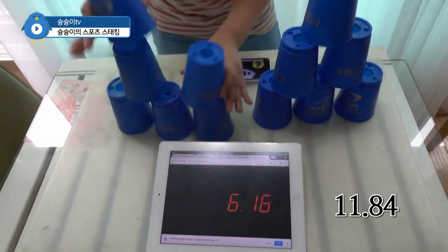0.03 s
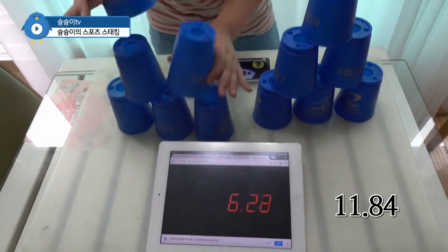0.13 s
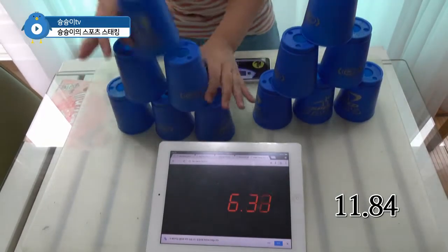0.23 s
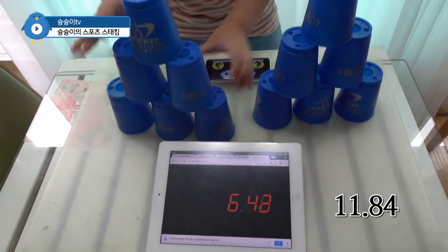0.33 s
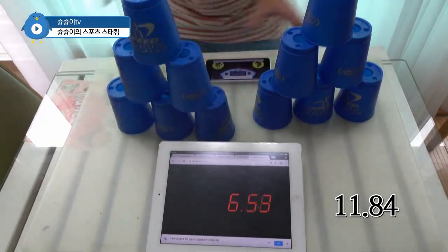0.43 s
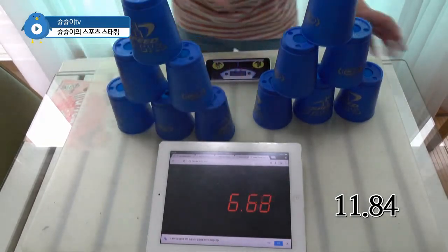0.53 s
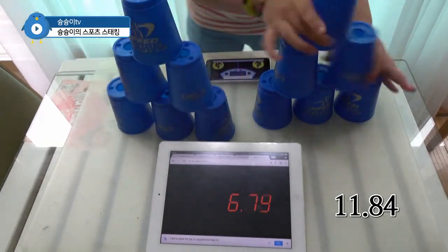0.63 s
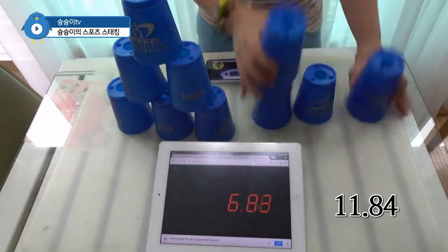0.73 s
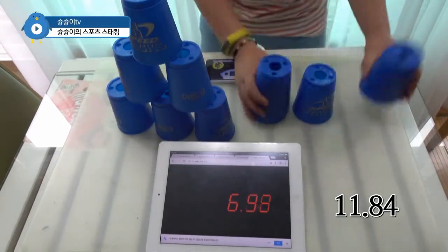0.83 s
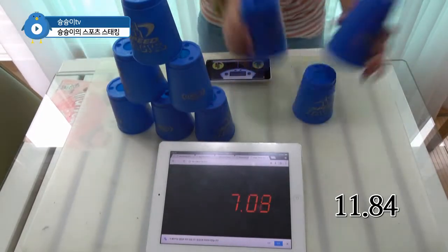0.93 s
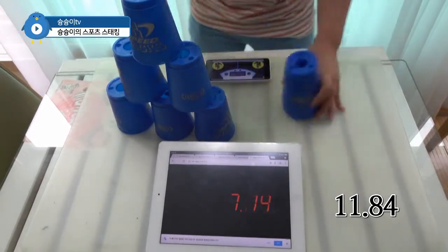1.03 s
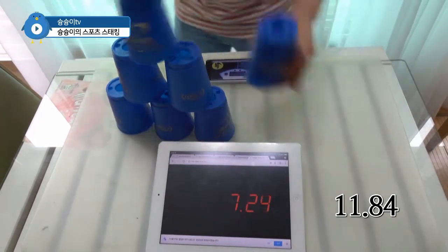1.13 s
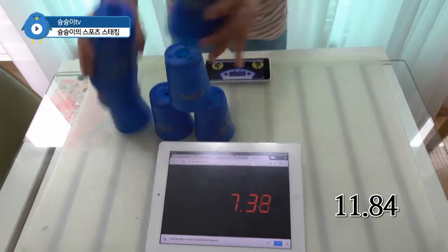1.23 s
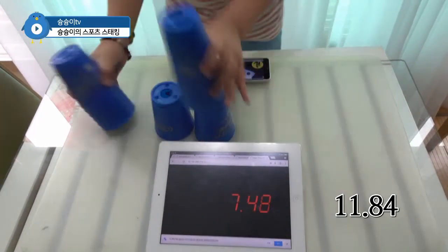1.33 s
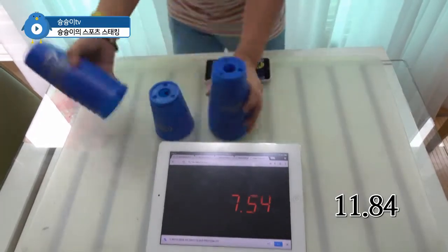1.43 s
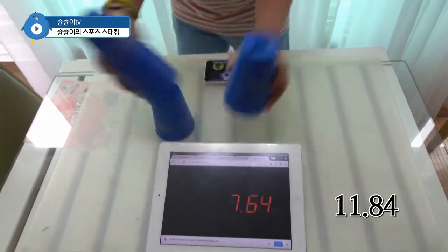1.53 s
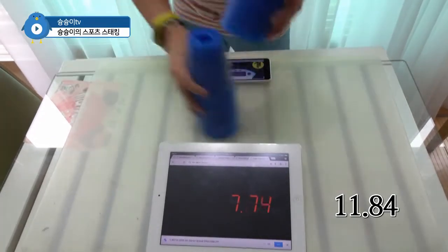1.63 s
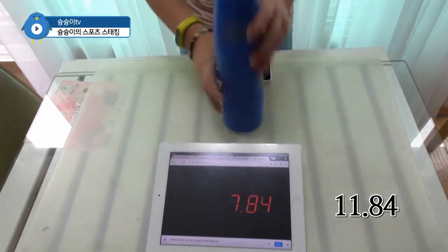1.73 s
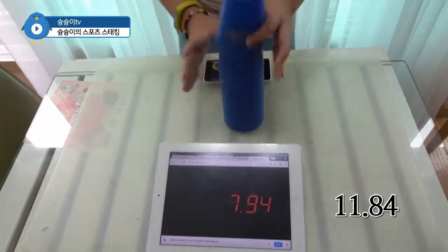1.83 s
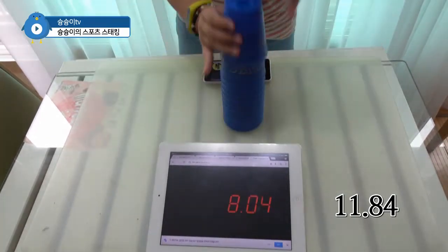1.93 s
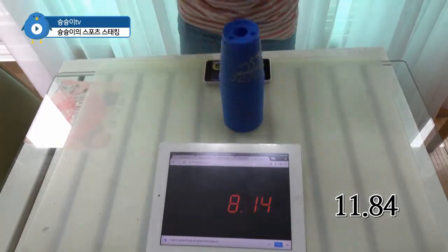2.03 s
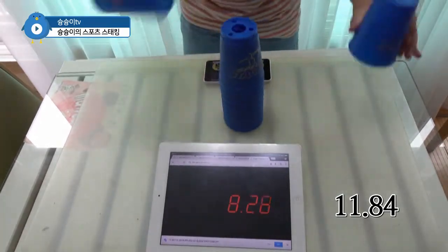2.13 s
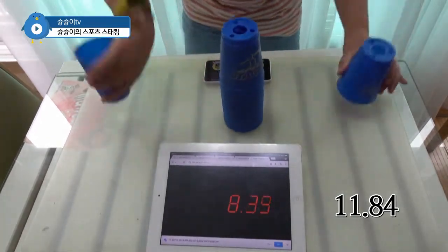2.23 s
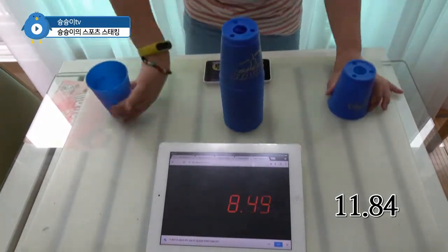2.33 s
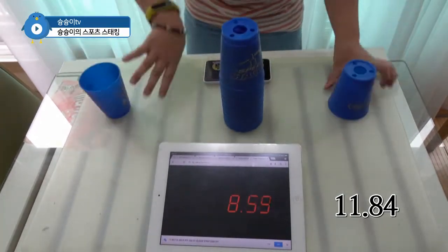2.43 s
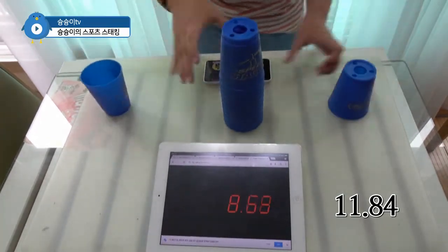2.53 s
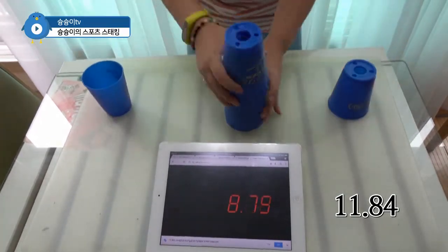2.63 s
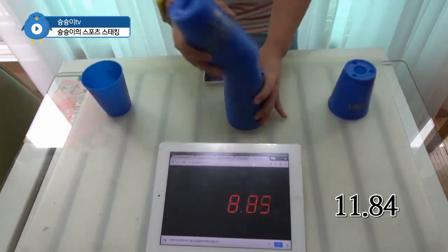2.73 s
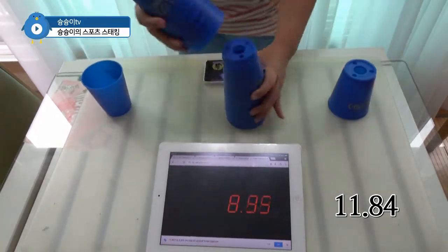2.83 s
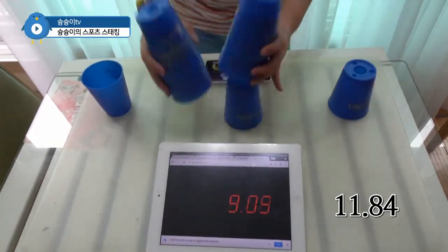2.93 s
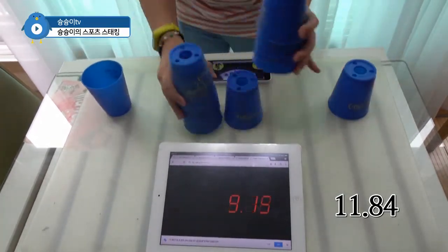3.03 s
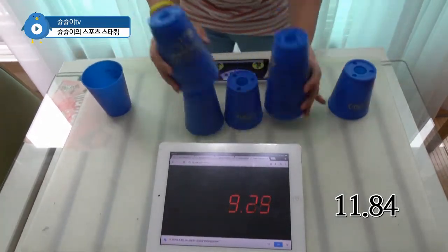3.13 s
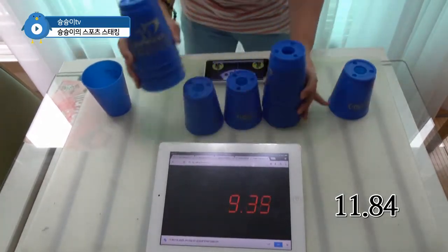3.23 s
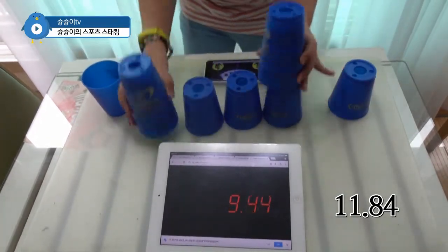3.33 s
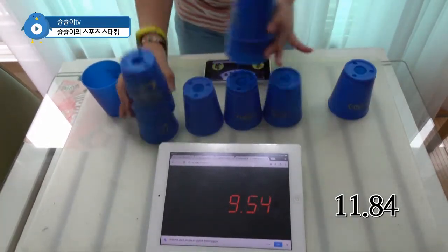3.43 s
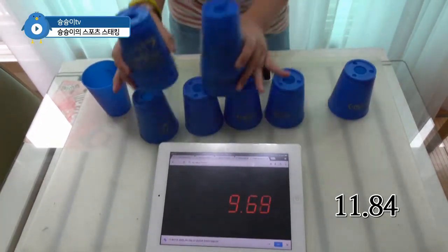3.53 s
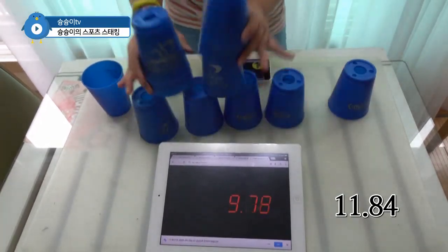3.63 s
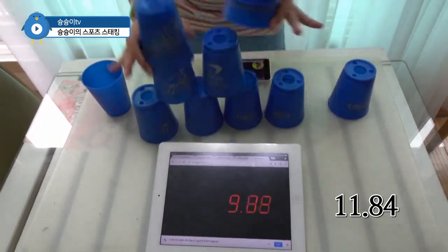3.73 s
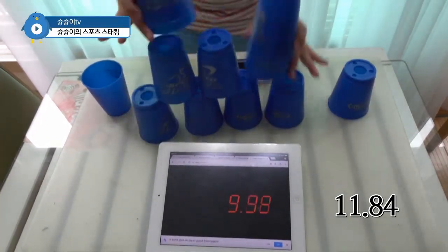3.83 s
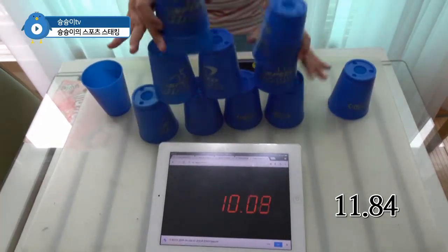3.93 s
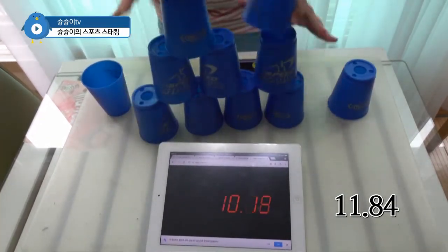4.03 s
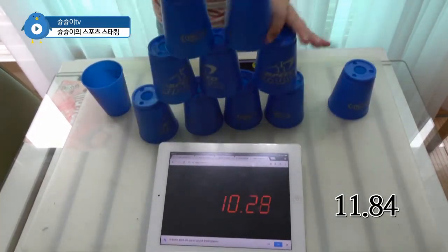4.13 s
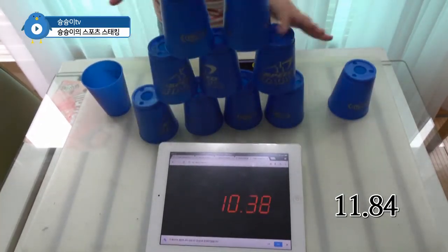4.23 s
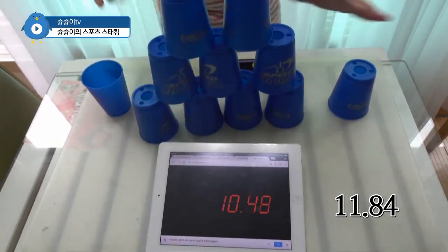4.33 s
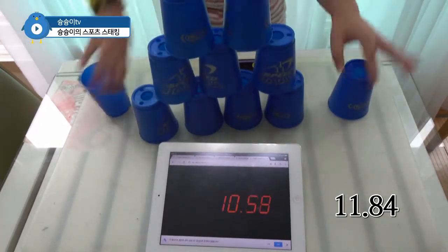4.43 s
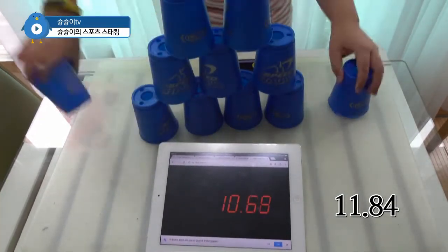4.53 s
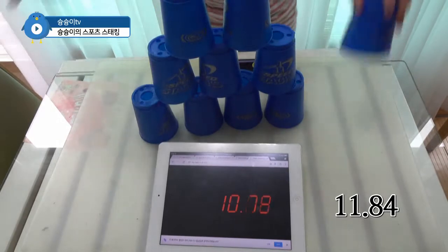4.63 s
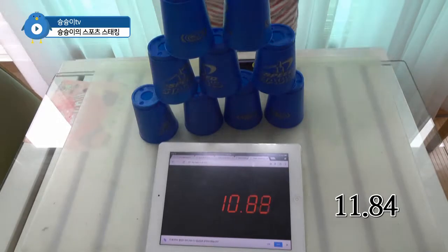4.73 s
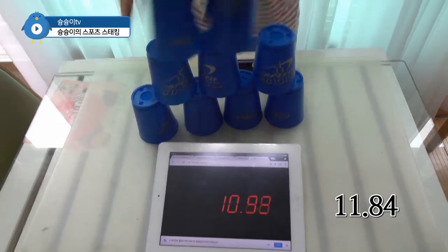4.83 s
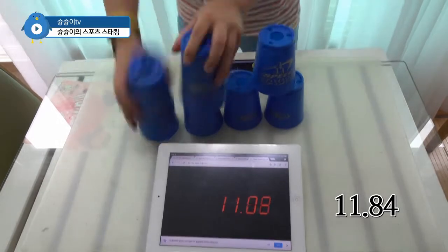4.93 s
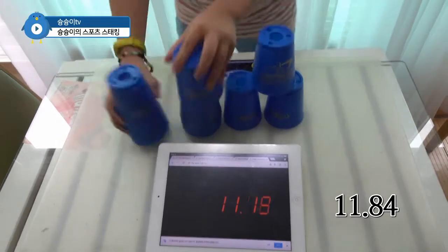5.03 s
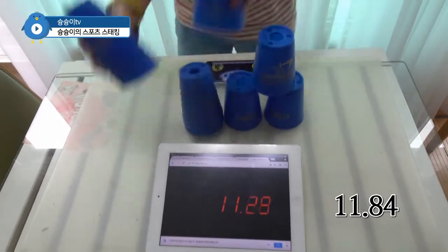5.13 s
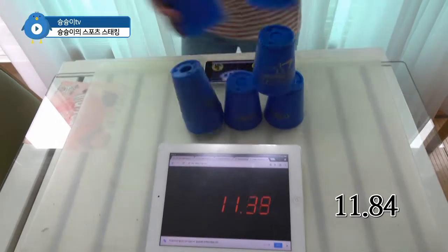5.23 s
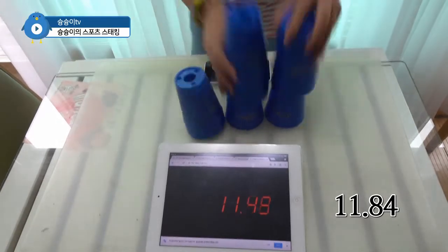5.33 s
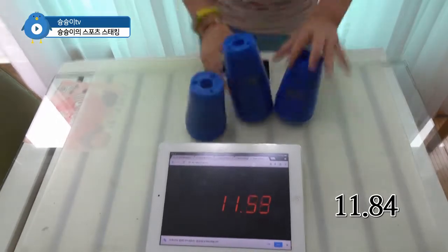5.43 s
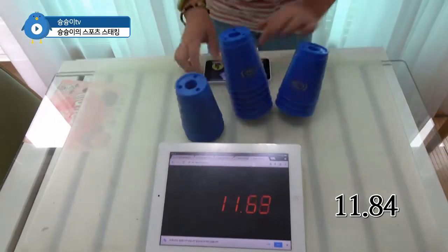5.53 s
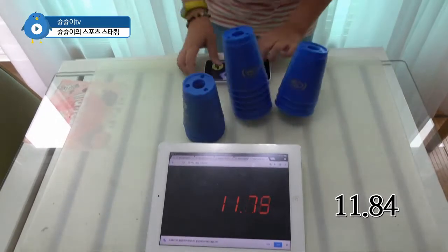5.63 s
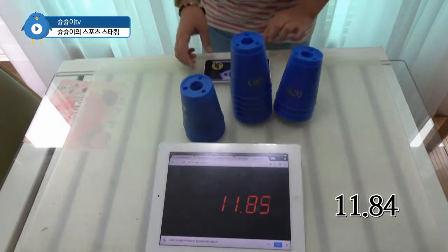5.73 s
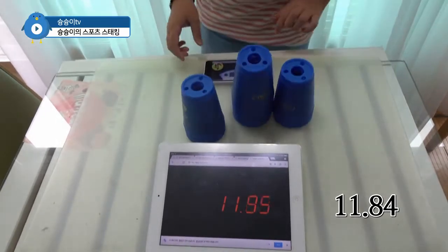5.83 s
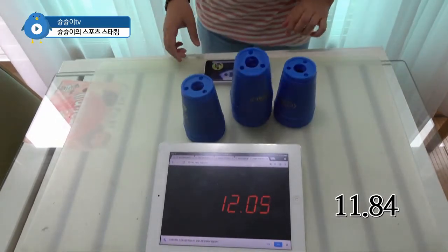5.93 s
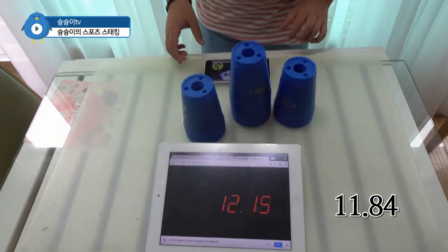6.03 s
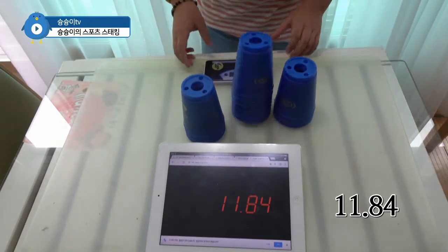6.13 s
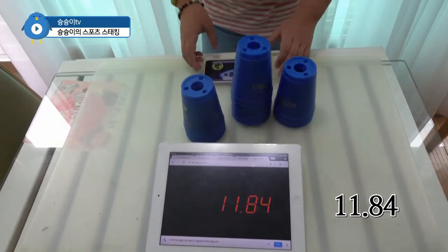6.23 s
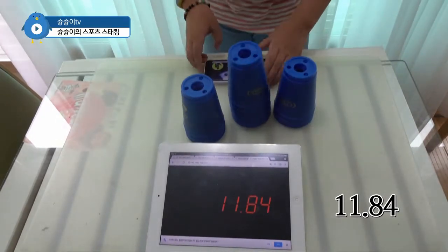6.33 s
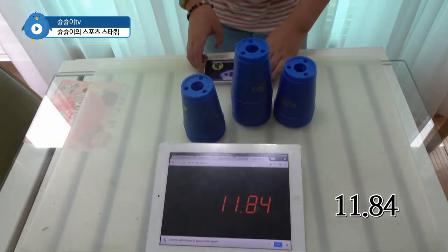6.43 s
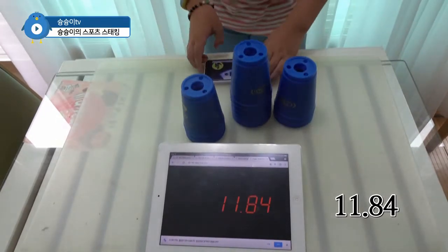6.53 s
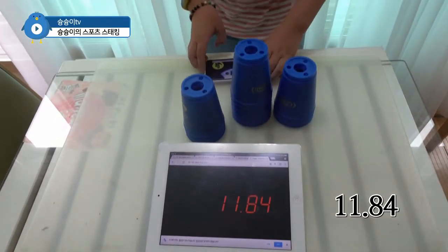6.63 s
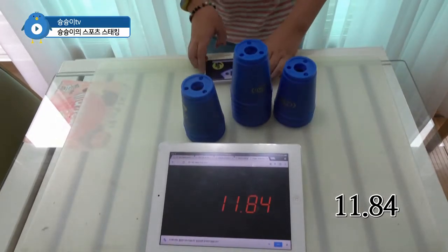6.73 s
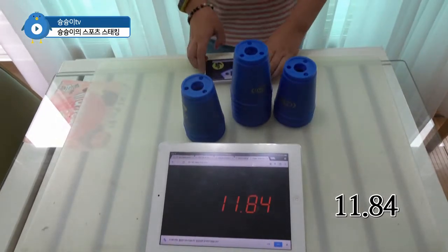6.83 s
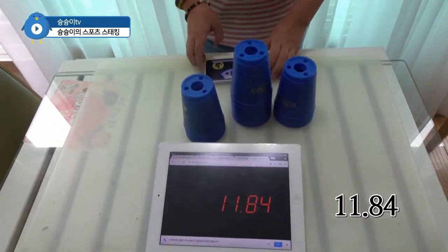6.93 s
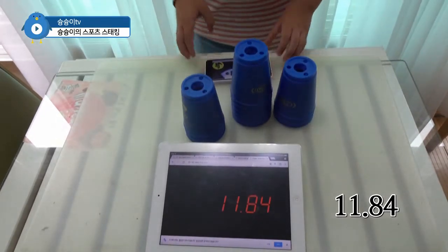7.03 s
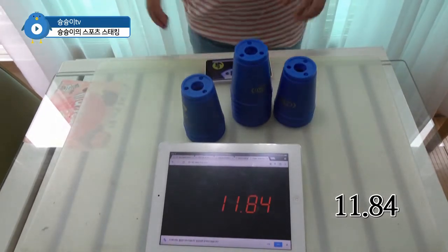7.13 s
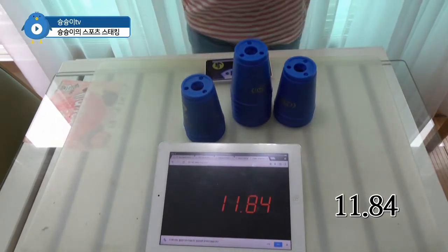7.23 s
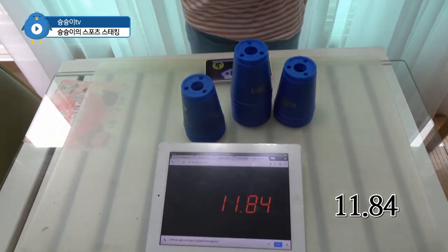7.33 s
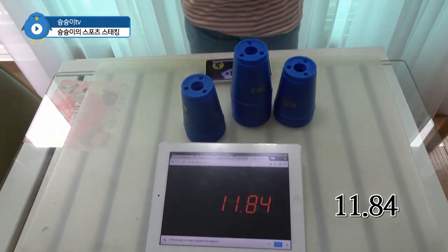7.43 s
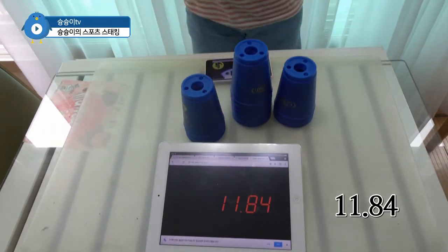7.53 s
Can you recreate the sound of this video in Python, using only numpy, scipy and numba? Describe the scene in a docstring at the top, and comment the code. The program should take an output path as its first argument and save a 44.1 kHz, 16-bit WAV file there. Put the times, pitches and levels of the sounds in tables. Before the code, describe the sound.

Close, loud clatter of hollow plastic cups in a small live room: scattered knocks, quick zipping rattles as cups nest, and a hard flurry of set-downs. Quieter handling and brushing follow, then another rapid run of clacks, a last sliding crash of stacks, and a few dull hand slaps on a plastic case. It settles into low room noise with a slight fabric rustle.

```python
"""Plastic cups are raced up into pyramids and down into stacks on a table in a small, live room with a low, steady noise.
From the start each blow rings the modes of the cup wall, cracks at the rim and drums the table.
Nesting cups chatter by stick and slip, fingers tick, and hands brush the plastic with a grainy hiss.
Then soft palms slap the plastic case of a timer, and at last clothes rustle as shaped, fluttering noise.
A limiter holds the peaks down throughout."""
import sys
import numpy as np
from scipy import signal
from scipy.fft import rfft, irfft, next_fast_len
from scipy.io import wavfile
from scipy.ndimage import uniform_filter1d, minimum_filter1d
from numba import njit

SR = 44100
rng = np.random.default_rng(int(sys.argv[2]) if len(sys.argv) > 2 else 0)


def log_audio(samples):
    """Write samples as a 16-bit WAV file to the path given in sys.argv[1]."""
    # one column per channel
    frames = np.atleast_2d(samples).T
    # limit to full scale, then quantise
    limited = np.clip(frames, -1, 1)
    pcm = np.round(limited * 32767).astype(np.int16)
    wavfile.write(sys.argv[1], SR, pcm)


N = 335146
PLACES = 4  # spots on the table, each with its own echoes
RING = np.arange(SR // 4) / SR  # time axis of one ring-out [s]

# A cup is set down on the table or on other cups: (time [s], strength [dB],
# push into the table over strength [dB], hollow note [Hz], hollow note over strength [dB])
LANDINGS = [(.002, -14.5, -9, 1225, -14.5), (.018, -16.5, -24, 883, -1), (0.034, -14, -6, 990, -3),
            (.074, -19.5, -1, 617, 1), (.212, -5, 0, 834, -1.5), (.221, -3, -5, 685, -0.5),
            (.281, -4, -31, 1187, -2.5), (0.643, -30, -2, 1150, -3), (.66, -14, -2, 530, -5.5),
            (0.78, -12, -3, 670, -5), (0.836, -4, 0, 1652, -3), (1.038, -12, 15, 753, 4),
            (1.19, -16, 1, 744, 10), (1.294, 1, -14, 968, 2), (1.34, 3, 3, 1130, 0),
            (1.388, 3, -3, 1200, -5), (1.425, -2.5, 7, 670, -13), (1.647, -29.5, 16.5, 730, 8),
            (1.702, -18.5, 4, 551, 5), (1.77, -14, 9, 740, 0), (1.909, -25.5, 2, 771, 1.5),
            (2.331, -3.5, 3, 926, 4.5), (2.343, -10, -8, 786, 4), (2.351, -6, -10, 658, 1),
            (2.729, -32.5, 5, 748, 6.5), (2.797, -24, -10, 1463, -8), (2.89, -33, 12, 913, 7),
            (3.082, -12.5, 5, 512, -6), (3.143, -18.5, 3, 560, -1), (3.22, -12.5, 5, 508, -1),
            (3.406, 2, -1, 1333, -6), (3.424, -3.5, -3, 660, -3), (3.464, -18, 3, 635, 6),
            (3.574, -5, -1, 580, -4.5), (3.682, -19, 2, 660, -1), (3.715, -2, -11.5, 650, -5),
            (3.822, -1, -1, 568, -6.5), (3.904, 3, -4.5, 666, -2), (3.987, -2.5, -6.5, 1123, -2),
            (4.012, -21.5, -8, 1542, 9), (4.162, -1.5, 0.5, 1170, 0), (4.244, -7, -7, 1022, -2),
            (4.257, -11, 3.5, 1150, 7), (4.332, -17.5, 3, 1080, 4.5), (4.35, -15.5, -0.5, 1160, 5),
            (4.48, -31, 20.5, 798, 4), (4.525, -29.5, 12, 870, -12), (4.799, 5, 3.5, 1160, 0),
            (4.811, -9, -26, 1075, 6.5), (5.325, -4.5, -15, 1220, -9)]
# Rim strikes rim as a pyramid is swept down: (time [s], strength [dB])
CLASHES = [(0.277, -15), (0.709, -21), (0.754, -12.5), (.766, -17), (1.001, 0.5), (1.054, -17),
           (1.165, -11.5), (1.224, -5), (1.268, -8), (1.53, -31.5), (1.579, -27.5), (1.612, -26),
           (1.648, -25), (1.691, -24.5), (1.753, -32), (1.819, -18), (4.839, -9), (4.85, -14),
           (4.885, -10.5), (4.941, -2), (5.101, -20), (5.365, -21.5), (5.414, -6)]
# Hands on the timer pads: (time [s], slap strength [dB], thump of the table [dB])
SLAPS = [(5.843, -13, -20), (5.985, -19, -27.5), (6.003, -21, -39), (6.103, -34.5, -37), (6.31, -24, -27),
         (6.459, -34.5, -30), (6.475, -36, -52), (6.558, -38, -35), (6.636, -48, -42)]
# Spectrum of a rim contact: (frequency [Hz], level [dB])
RIM_SPECTRUM = [(500, 8.5), (1200, -23.5), (2000, 8), (3000, 3), (4000, 1), (5300, 1), (7500, -4.5),
                (10000, -12), (15000, -88)]
# Spectrum of a light, sharp tick: (frequency [Hz], level [dB])
TICK_SPECTRUM = [(1000, 5), (3000, 5.5), (5500, 7.5), (10000, -4), (15000, -14)]


def undb(db):
    """Decibels to amplitude ratio, by the logarithmic law of level."""
    return 10 ** (np.asarray(db) / 20)


def along(points, hz):
    """Interpolate (Hz, value) points linearly on a log-frequency axis."""
    f, value = np.transpose(points)
    return np.interp(np.log(hz + 1e-9), np.log(f), value)


def decay(t, t60):
    """Exponential decay: the level falls 60 dB in t60 seconds."""
    return np.exp(-np.log(1000) * t / t60)


def colour(x, points):
    """Minimum-phase filter with a (Hz, dB) shape: the folded cepstrum makes the response causal."""
    size = next_fast_len(x.shape[-1] + 2048, True) // 2 * 2
    magnitude = undb(along(points, np.fft.rfftfreq(size, 1 / SR)))
    cepstrum = irfft(np.log(magnitude))
    cepstrum[1:size // 2] *= 2
    cepstrum[size // 2 + 1:] = 0
    response = np.exp(rfft(cepstrum))
    return irfft(rfft(x, size) * response)[..., :x.shape[-1]]


def high_pass(x, hz):
    """Radiation efficiency: small bodies radiate little below their lowest mode."""
    return signal.sosfilt(signal.butter(4, hz, "high", fs=SR, output="sos"), x)


def unit(x):
    """Normalise the energy of a ring-out: rms 1 over its first 10 ms."""
    return x / np.sqrt(np.mean(x[..., :SR // 100] ** 2, axis=-1, keepdims=True))


def add(track, s, sound):
    """Superpose a sound on a track from time s."""
    start = int(np.clip(s * SR, 0, N - 1))
    track[start:start + len(sound)] += sound[:N - start]


def ring(modes, detune=0, scatter_db=0):
    """Modal synthesis of one blow: on a cup, the spot struck shifts the strength and sign of each mode."""
    hz, db, t60 = np.transpose(modes)[:, :, None]
    shift, strength, side = rng.standard_normal((3, len(modes), 1))
    sign = np.sign(side) if scatter_db else 1
    waves = np.sin(2 * np.pi * hz * (1 + detune * shift) * RING) * decay(RING, t60)
    return unit(np.sum(sign * undb(db + scatter_db * strength) * waves, axis=0))


def cracks(spectrum, t60, count):
    """High modal density: the crowded upper modes of thin plastic act as brief, decaying noise."""
    t = RING[:len(RING) // 4]
    bursts = rng.standard_normal((count, len(t))) * decay(t, t60)
    return unit(colour(bursts, spectrum))


def cup_walls():
    """Modes under two boundary conditions: free walls, and nested ones whose upper modes speak more."""
    # Modes of a cup wall: (frequency [Hz], level [dB], t60 [s])
    wall_modes = [(570, 3.5, 0.031), (672.5, -0.5, 0.05), (797, 4, 0.03), (934, 0, 0.024),
                  (1025.5, -7.5, 0.077), (1160, 6, 0.014), (1315, -1.5, 0.025), (1455, -3.5, 0.034),
                  (1643, 0.5, 0.013), (1835, -6.5, 0.035), (2133, -4.5, 0.023), (2410, -22, 0.1)]
    # a cup inside another is gripped low down, which tilts its modes by 6 dB per octave
    gripped = [(hz, db + 6 * np.log2(hz / 1000), t60) for hz, db, t60 in wall_modes]
    free = np.array([ring(wall_modes, detune=.02, scatter_db=2.5) for _ in range(32)])
    nested = [ring(gripped, detune=.06, scatter_db=4) for _ in range(48)]
    return free, nested


def rebounds(wall, crack, gap_s, rattle_s, count=5):
    """Damped rebound: a cup hits and rocks on its rim, ever weaker, and the crack dies before the wall."""
    out, gaps = np.zeros(2 * len(RING)), gap_s * rng.uniform(.5, 1.5, count)
    delays = np.cumsum(gaps) - gaps[0]
    spots = rng.integers(len(wall), size=count)  # wall and crack hold one sound for each spot struck
    for delay, spot in zip(delays, spots):
        size = np.exp(-delay / rattle_s)
        add(out, delay, size * wall[spot])
        add(out, delay, size ** 3.9 * crack[spot])
    return out


def landings(walls, wall_gain_db=-8, crack_gain_db=-17.5, snap_db=-11):
    """Impact excitation of cups set down: mostly wall, a little rim; one track for each place."""
    out = np.zeros((PLACES, N))
    rims = cracks(RIM_SPECTRUM, t60=0.051, count=len(walls))
    snaps = cracks(TICK_SPECTRUM, t60=0.036, count=len(walls))
    wall = undb(wall_gain_db) * walls
    crack = undb(crack_gain_db) * (rims + undb(snap_db) * snaps)
    for k, (s, db, *_) in enumerate(LANDINGS):
        add(out[k % PLACES], s, undb(db) * rebounds(wall, crack, gap_s=.008, rattle_s=0.0071))
    return out


def clashes(walls, wall_gain_db=-1, rim_gain_db=-5, snap_db=-2):
    """Hard contact excites high modes: rim on rim cracks brightly; one track for each place."""
    out = np.zeros((PLACES, N))
    rims = cracks(RIM_SPECTRUM, t60=0.0098, count=len(walls))
    snaps = cracks(TICK_SPECTRUM, t60=0.0038, count=len(walls))
    wall = undb(wall_gain_db) * walls
    crack = undb(rim_gain_db) * (rims + undb(snap_db) * snaps)
    for k, (s, db) in enumerate(CLASHES):
        add(out[k % PLACES], s, undb(db) * rebounds(wall, crack, gap_s=.007, rattle_s=0.0059))
    return out


def slides(walls, rate=260, scatter_db=7.5, wall_gain_db=-15.0, scrape_gain_db=-11):
    """Stick-slip friction: uneven contacts scrape the rims first, and walls chatter as the stack closes."""
    # Cups slide down into a stack: (start [s], length [s], wall chatter [dB], rim scrape [dB])
    descents = [(0.748, 0.11, -13, -26.5), (1.029, 0.042, -5.5, -16.5), (1.246, 0.038, -26, -19),
                (1.3, 0.11, -28, -22), (1.82, 0.076, -28, -36), (4.797, 0.095, -15, -19),
                (4.888, 0.12, -5.5, -20), (5.372, 0.082, -6.5, -24)]
    # Spectrum of a scraping rim: (frequency [Hz], level [dB])
    scrape_spectrum = [(500, -37), (1100, -27), (1800, 13.5), (3000, 9.5), (4000, 5.5), (5500, 6),
                       (7500, -1), (10000, -1.5), (15000, -12.5)]
    swell_db, dull_db = 13, 0.5  # over a slide the walls grow louder and the rims fade
    settle_s, stop_db_per_s = .08, 546  # contacts of a seated stack die out this fast
    out, rims = np.zeros((PLACES, N)), cracks(scrape_spectrum, t60=0.021, count=len(walls))
    for start, length, wall_db, scrape_db in descents:
        slips = np.arange(0, length + settle_s, 1 / rate)
        for at, (late, force, spot) in zip(slips, rng.random((256, 3))):
            at, spot = at + late / rate, int(spot * len(walls))
            way = min(at / length, 1)  # 0 at the start, 1 when seated
            track = out[spot % PLACES]
            force_db = scatter_db * np.sqrt(12) * (force - .5)  # uniform, with scatter_db as its deviation
            size = undb(force_db - stop_db_per_s * max(at - length, 0))
            chatter = undb(wall_db + wall_gain_db - swell_db * (1 - way)) * walls[spot]
            scrape = undb(scrape_db + scrape_gain_db - dull_db * way) * rims[spot]
            add(track, start + at, size * chatter)
            add(track, start + at, size * scrape)
    return out


def hollows(t60=0.042, gain_db=-2.5, rise_s=0.0029):
    """Resonance of air and wall: each landing cup or stack sounds a short note set by its size and grip."""
    out = np.zeros(N)
    for s, db, _, ring_hz, ring_db in LANDINGS:
        note = ring([(ring_hz, 0, t60)]) * (1 - np.exp(-RING / rise_s))
        add(out, s, undb(db + ring_db + gain_db) * note)
    return out


def table(contact_s=0.00039, gain_db=0.5):
    """Plate modes driven by every blow: heavy stacks thump, single cups knock; no deep bass is radiated."""
    # Low modes of the tabletop: (frequency [Hz], level [dB], t60 [s])
    thump_modes = [(145.2, 0.5, 0.19), (202.3, -13, 0.26), (262.1, 4, 0.087)]
    # Higher modes of the tabletop: (frequency [Hz], level [dB], t60 [s])
    knock_modes = [(297, 3.5, 0.029), (362.4, 7, .13), (435, -6, 0.098), (473, -4, 0.13), (561.6, -1, 0.11)]
    # A stack comes down on the table: (time [s], thump strength [dB])
    stacks = [(0.852, -21), (1.053, -15.5), (1.451, -12), (1.466, -22), (1.82, -22), (2.807, -33.5),
              (4.942, -14), (5, -9), (5.028, -16), (5.414, -20), (5.439, -15.5)]
    landing_thump_db, landing_knock_db = -19, -14.5  # against the push of a landing
    clash_thump_db, clash_knock_db = -15, -10  # against the strength of a clash
    stack_knock_db, palm_knock_db = 1, 3.5  # knock against thump
    pushes = [(s, db + share + landing_thump_db, db + share + landing_knock_db)
              for s, db, share, *_ in LANDINGS]
    pushes += [(s, db + clash_thump_db, db + clash_knock_db) for s, db in CLASHES]
    pushes += [(s, db, db + stack_knock_db) for s, db in stacks]
    pushes += [(s, db, db + palm_knock_db) for s, _, db in SLAPS]
    out, press = np.zeros(N), 1 - np.exp(-RING / contact_s)
    for s, thump_db, knock_db in pushes:
        add(out, s, undb(thump_db) * press * ring(thump_modes, detune=0.028))
        add(out, s, undb(knock_db) * press * ring(knock_modes, detune=0.03))
    return undb(gain_db) * high_pass(high_pass(out, hz=118.5), hz=103)


def timer(case_gain_db=-6, smack_gain_db=-17, contact_s=0.0022):
    """Soft contact lengthens the onset: palms slap the modes of the timer's plastic case."""
    # Modes of the timer case: (frequency [Hz], level [dB], t60 [s])
    case_modes = [(498, -3, 0.057), (655, -3.5, 0.092), (865, -0.5, 0.016), (1150, -4, 0.037),
                  (1644, 3, 0.025)]
    # Spectrum of a palm smack: (frequency [Hz], level [dB])
    palm_spectrum = [(400, -19), (1300, 4), (4000, -2), (7000, -18), (14000, -46)]
    out, smacks = np.zeros(N), cracks(palm_spectrum, t60=0.015, count=len(SLAPS))
    press = 1 - np.exp(-RING / contact_s)
    for (s, db, _), smack in zip(SLAPS, smacks):
        add(out, s, undb(db + case_gain_db) * press * ring(case_modes, detune=0.076))
        add(out, s, undb(db + smack_gain_db) * smack)
    return out


def ticks(gain_db=-7):
    """Brief contact has a broad spectrum: fingernails and rim edges are bright, with no body."""
    # Light ticks of fingers and rims: (time [s], strength [dB])
    touches = [(0.47, -41.5), (0.723, -17.5), (1.188, -17.5), (1.251, -5), (1.425, -17), (1.909, -36.5),
               (2.21, -41.5), (2.5717, -34.5), (2.6366, -37), (3.3425, -31.5), (3.912, -16.5), (4.352, -35),
               (4.4332, -40.5), (4.578, -40), (4.924, -18), (5.379, -25), (6.1584, -53.5)]
    out = np.zeros(N)
    for (s, db), tick in zip(touches, cracks(TICK_SPECTRUM, t60=0.015, count=len(touches))):
        add(out, s, undb(db + gain_db) * tick)
    return out


def rubs(rate=900, grain_db=5, crest=0.38, gain_db=-6):
    """Friction noise of skin and cloth on plastic: a grainy hiss swells and fades with each stroke."""
    # Hands and sleeves brush over plastic: (start [s], length [s], strength [dB])
    strokes = [(1.556, 0.31, -33), (1.85, 0.84, -59), (2.688, .13, -40.5), (2.872, 0.093, -43.5),
               (2.952, 0.11, -40), (3.34, 0.073, -43), (6.897, 0.24, -55), (7.452, 0.079, -54)]
    # Spectrum of the brushing: (frequency [Hz], level [dB])
    rub_spectrum = [(500, -9), (1500, 4), (3000, 0), (5000, 1.5), (8000, -2), (15000, -13)]
    t, step = np.arange(N) / SR, int(SR / rate)
    pressure = np.zeros(N)
    for s, length, db in strokes:
        pressure += undb(db) * np.interp(t, [s, s + crest * length, s + length], [0, 1, 0])
    hiss = rng.standard_normal(N)
    grip = undb(grain_db * rng.standard_normal(N))[np.arange(N) // step]  # one random force per grain
    hiss = colour(hiss * grip, rub_spectrum)
    return undb(gain_db) * pressure * hiss / np.std(hiss)


def diffuse(size):
    """Diffuse-field coherence: noise alike left and right in the bass, unrelated in the treble."""
    # Side over mid of the two channels: (frequency [Hz], level [dB])
    width = [(40, -24), (200, -22.5), (600, -16), (1300, -7.5), (2800, -4.5), (5000, 0.5), (14000, 0)]
    mid, side = rng.standard_normal((2, size))
    side = colour(side, width)
    return np.array([mid + side, mid - side])


def clothes(rate=60, flutter_db=3.5):
    """Modulated noise: soft fabric shifts with an uneven flutter, darker than skin on plastic."""
    # Clothes rustle as the player steps back: (time [s], level [dB])
    rustle = [(6.7, -81), (6.98, -54.5), (7.15, -59), (7.42, -52), (7.48, -45), (7.6, -49.5)]
    # Spectrum of the fabric: (frequency [Hz], level [dB])
    cloth_spectrum = [(200, -17), (600, 2), (1500, 2), (3000, -4), (6000, -19), (10000, -20), (15000, -27)]
    s, db = np.transpose(rustle)
    folds = np.interp(np.arange(N) * rate / SR, np.arange(N), rng.standard_normal(N))
    noise = colour(diffuse(N), cloth_spectrum)
    level_db = np.interp(np.arange(N) / SR, s, db, left=-np.inf)  # silent before the first point
    return undb(level_db + flutter_db * folds) * noise / np.std(noise)


def room(x, wet_db, early_db=4, early_s=0.0067, first_s=.004):
    """Reverberation by convolution: strong early reflections, then a tail whose treble dies soonest."""
    # Reverberation time: (frequency [Hz], t60 [s])
    room_decay = [(150, 0.55), (700, 0.47), (2000, 0.47), (5000, 0.41), (14000, 0.22)]
    # Spectrum of the reverberation: (frequency [Hz], level [dB])
    room_colour = [(100, -4.5), (300, 1), (600, -1.5), (1200, -1.5), (3000, -2), (6000, -4.5), (15000, 4.5)]
    t = np.arange(SR * 3 // 4) / SR
    noise, hz = rfft(diffuse(len(t))), np.fft.rfftfreq(len(t), 1 / SR)
    tail = 0
    for k, (_, t60) in enumerate(room_decay):
        band = along([(f, j == k) for j, (f, _) in enumerate(room_decay)], hz)  # bands cross-fade
        tail = tail + irfft(noise * band, len(t)) * decay(t, t60)
    tail = tail * (t > first_s) * (1 + undb(early_db) * np.exp(-t / early_s))
    tail = colour(tail / np.sqrt(np.sum(tail ** 2) / 2), room_colour)
    return x + undb(wet_db) * signal.fftconvolve(x[None], tail, axes=1)[:, :N]


def background(level_db=-44.5):
    """Stationary coloured noise: the low, steady noise of the room."""
    # Spectrum of the room noise: (frequency [Hz], level [dB])
    noise_spectrum = [(25, -7), (50, 6), (130, 5), (320, 5.5), (620, -1), (1000, -0.5), (2000, -10),
                      (3400, -19), (7000, -34), (10000, -41), (15000, -49)]
    noise = colour(diffuse(N), noise_spectrum)
    return undb(level_db) * noise / np.std(noise)


def scene():
    """Superposition: cups, timer and table sound in one room, each place with its own echoes."""
    free, nested = cup_walls()
    places = high_pass(landings(free) + clashes(free) + slides(nested), hz=261)
    cups = sum(room(place, wet_db=2.5, early_db=7.5, early_s=0.01) for place in places)
    notes = room(hollows(), wet_db=1.0, early_db=0.5, early_s=0.054)
    tabletop = room(table(), wet_db=-4.5, early_db=8.5, early_s=0.014)  # close and large: mostly direct
    slaps = room(timer(), wet_db=-0.5, early_db=8, early_s=.011)
    fingers = room(ticks() + rubs(), wet_db=7.0, early_db=7, early_s=0.0051)
    return cups + notes + tabletop + slaps + fingers + clothes() + background()


@njit
def envelope(peak, release):
    """Peak detection: follows a peak at once and lets go exponentially."""
    out, held = np.empty(len(peak)), 0.
    for i in range(len(peak)):
        held = max(peak[i], held * release)
        out[i] = held
    return out


def record(dry, ceiling_db=-5.0, release_s=0.038, top_hz=15200):
    """Peak limiting and band limiting: a limiter holds the peaks down, and the top is cut."""
    held = envelope(np.abs(dry).max(axis=0), np.exp(-1 / (release_s * SR)))
    gain = np.minimum(1, undb(ceiling_db) / held)
    gain = uniform_filter1d(minimum_filter1d(gain, size=45), size=45)  # ease into each peak over about 1 ms
    return signal.sosfilt(signal.ellip(8, .2, 70, top_hz, fs=SR, output="sos"), dry * gain)


dry = scene()
out = record(dry)
log_audio(out)
```